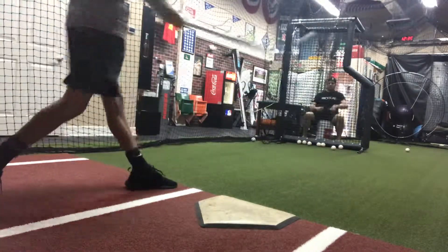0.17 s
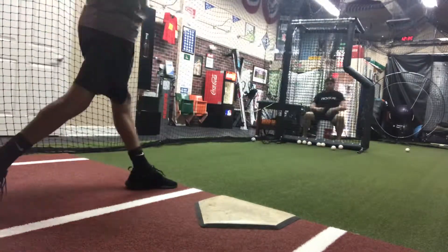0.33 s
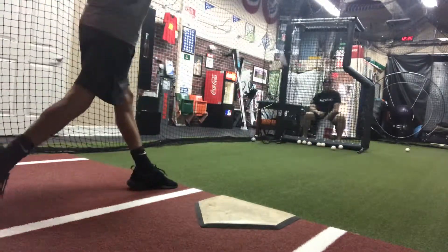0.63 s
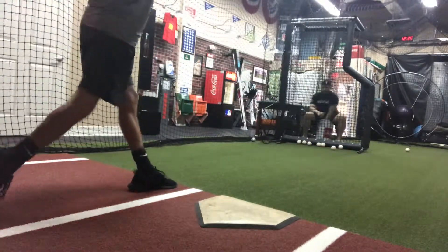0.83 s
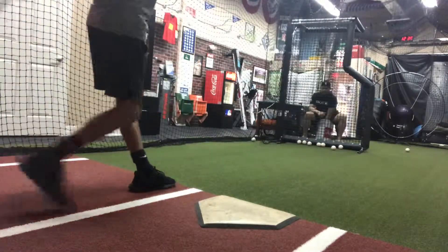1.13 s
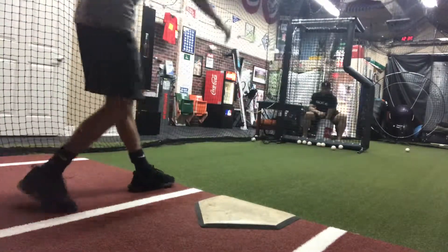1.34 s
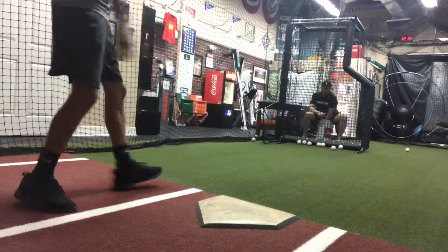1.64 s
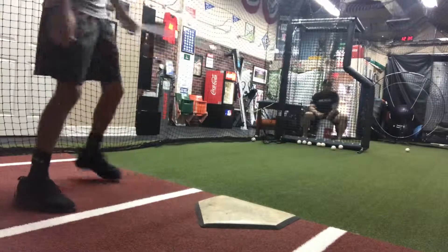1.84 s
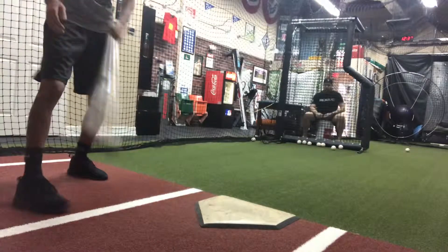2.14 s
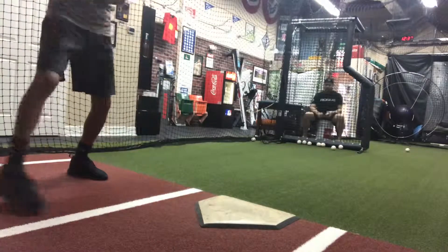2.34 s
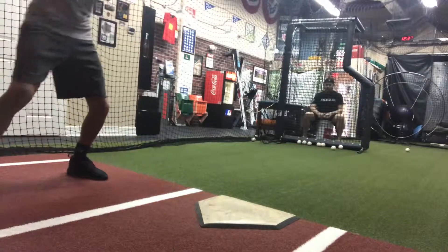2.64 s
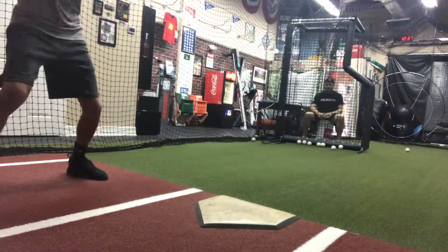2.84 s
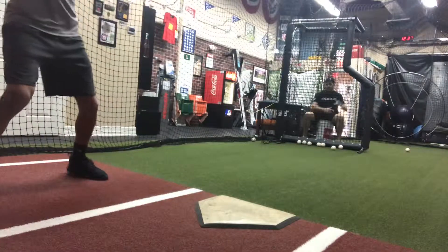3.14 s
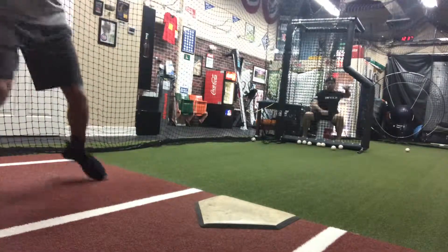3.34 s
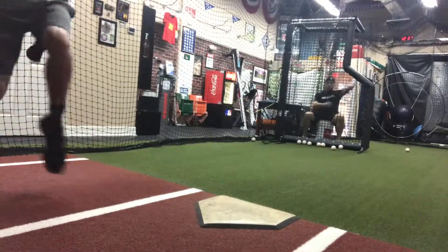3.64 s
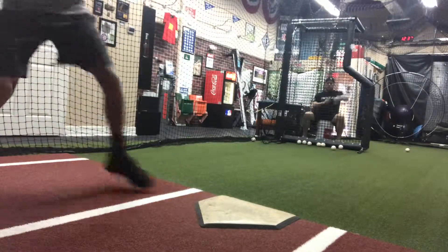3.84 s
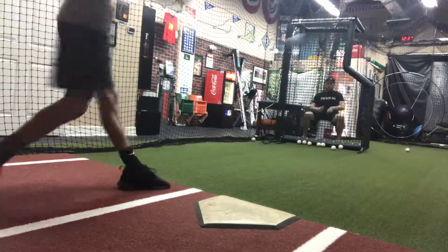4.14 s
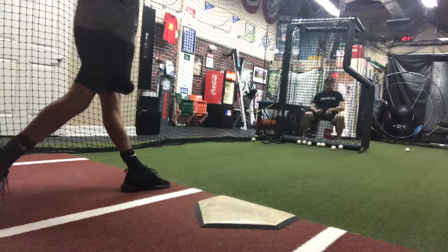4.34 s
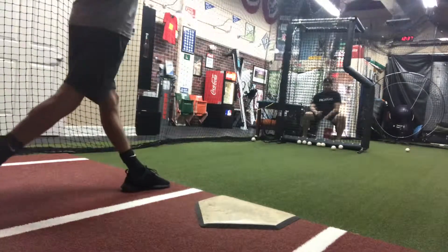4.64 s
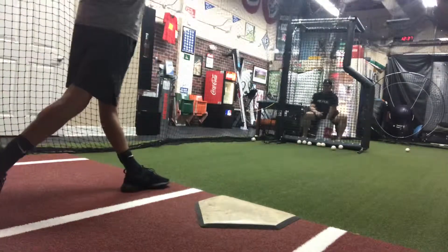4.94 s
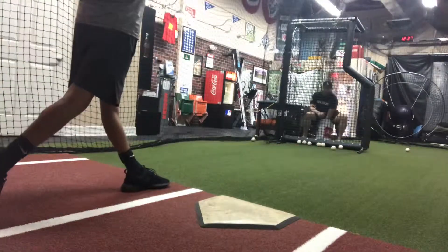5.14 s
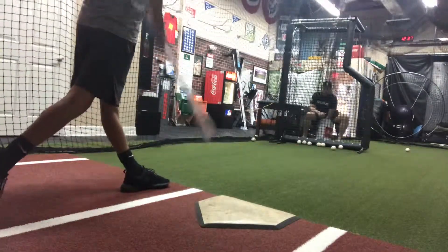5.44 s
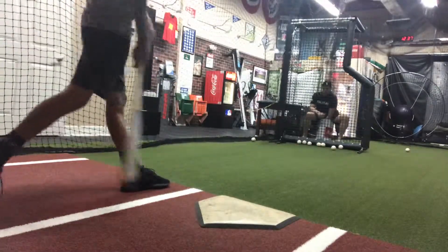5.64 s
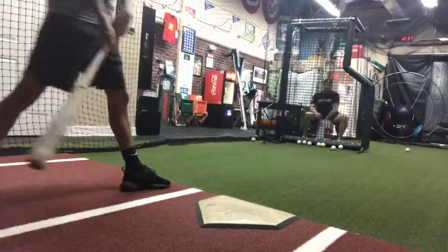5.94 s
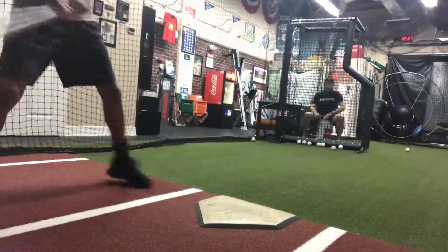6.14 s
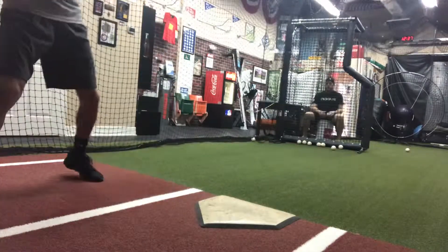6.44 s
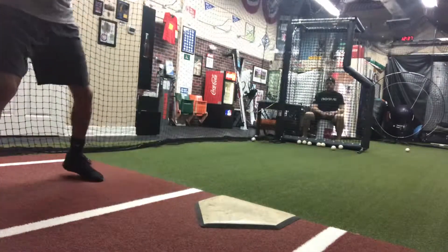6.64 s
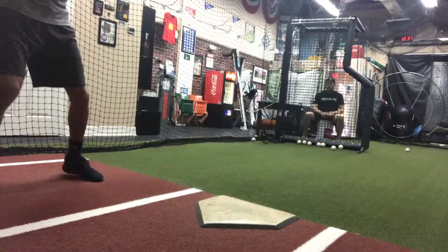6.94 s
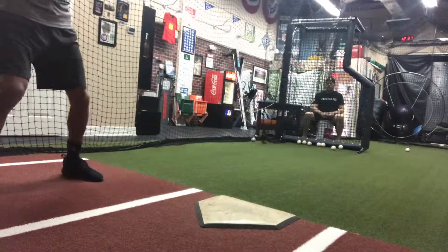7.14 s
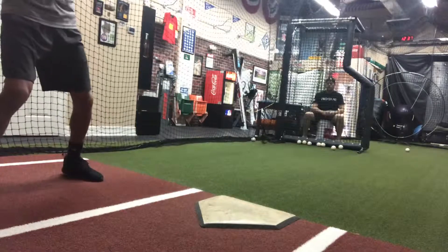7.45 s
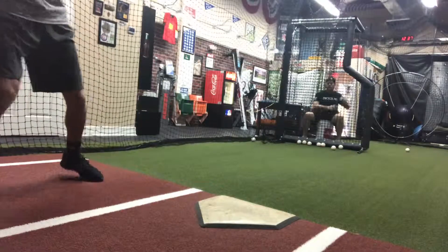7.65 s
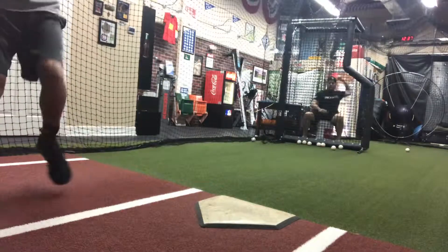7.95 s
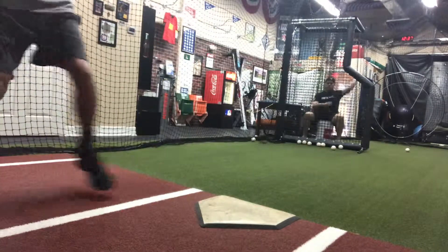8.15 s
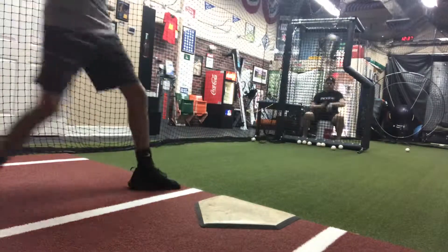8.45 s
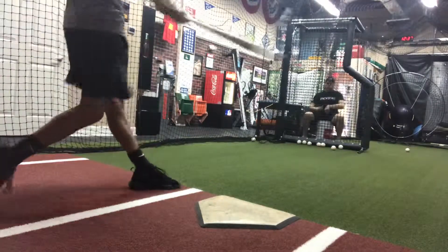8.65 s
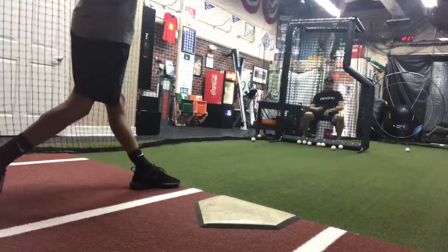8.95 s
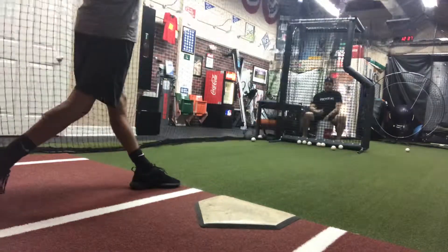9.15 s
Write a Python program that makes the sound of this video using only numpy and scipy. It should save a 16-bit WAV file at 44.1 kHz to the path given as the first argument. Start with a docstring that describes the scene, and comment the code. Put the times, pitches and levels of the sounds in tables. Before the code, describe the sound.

Close to a small microphone near the floor, three very loud, ringing bat hits stand out against quiet room air. The first is followed at once by a bright metal clang. Between hits come soft thuds on turf, dry clicks, cloth and shoe rustle and low floor booms. The last swing has a whoosh before impact, and the hard room reverberates.

```python
"""A batter hits three tossed balls in a netted indoor cage with turf floor and hard walls.
Throughout: ventilation hums, shoes and clothes rustle, steps boom through the floor.
The bat cracks at 0.23 s; at 0.38 s the ball clangs off the steel screen frame. Balls and bat tip
then knock on the turf, among small ticks. Further cracks follow at 4.27 s and 8.72 s.
Contacts are filtered clicks and ringing modes with echoes and a hall; the rest is shaped noise."""
import sys
import numpy as np
from scipy import signal
from scipy.io import wavfile

SR = 44100
rng = np.random.default_rng(int(sys.argv[2]) if len(sys.argv) > 2 else 0)


def bounce(signal):
    """Save signal as a 16-bit WAV file at the path given by the first command-line argument."""
    frames = np.transpose(np.atleast_2d(signal))
    limited = np.clip(frames, -1, 1)
    pcm = np.round(limited * 32767).astype(np.int16)
    wavfile.write(sys.argv[1], SR, pcm)


def boost_factor(decibels):
    """Convert a level in decibels to a linear amplitude factor."""
    exponent = np.asarray(decibels, float) / 20
    return 10 ** exponent


N = 410130
COARSE_S = np.arange(0, N + 40, 40) / SR   # time axis of slow controls

# bat on ball: t/s, click/dB, floor echo/ms, near wall echo/ms, hall send/dB, barrel ring/dB
HITS = [(0.233, -1, 1.7, 6.1, -16.5, 3), (4.272, -1.5, 1.3, 5.5, -19.5, 6), (8.718, 1, 4.5, 5.5, -19, 5)]


def bat():
    """A hard click excites the barrel's bending rings; floor, wall, ceiling and posts echo it."""
    # barrel's bending rings: f/Hz, width/Hz, share of the barrel ring dB
    barrel = [(1095, 86, 1.2), (1730, 180, 0.58), (2390, 150, 0.88)]
    # floor, near wall, ceiling, scatter from posts and legs: level/dB
    echo_levels_db = [-1.5, 10, -1.5, -4.5]
    # ceiling echo of each hit: lag/ms
    ceiling_lags_ms = [16.3, 17.4, 16.1]
    ceiling_treble_db = 8   # the hard ceiling gathers the top of the crack into one flick
    near, sent = np.zeros(N), np.zeros(N)
    treble = signal.butter(2, 5000, "high", fs=SR)
    no_treble = signal.butter(2, 4000, fs=SR)
    for (s, db, floor_ms, wall_ms, hall_db, barrel_db), ceiling_ms in zip(HITS, ceiling_lags_ms):
        rings = [(hz, width_hz, share * barrel_db) for hz, width_hz, share in barrel]
        crack = peaks(snap(db, cut_hz=340), rings)
        soft = signal.lfilter(*no_treble, crack)
        sharp = signal.lfilter(*treble, crack)
        scattered = scatter(boost_factor(5.5) * soft + boost_factor(-4) * crack, .007)
        add(near, s, crack + boost_factor(-2) * sharp + boost_factor(echo_levels_db[3]) * scattered)
        lags_ms = [floor_ms, wall_ms, ceiling_ms]
        for lag_ms, echo_db, copy in zip(lags_ms, echo_levels_db, [soft, -soft, soft]):
            add(near, s + lag_ms / 1000, boost_factor(echo_db) * copy)
        add(near, s + ceiling_ms / 1000, boost_factor(ceiling_treble_db) * sharp)
        add(sent, s, boost_factor(hall_db) * crack)
    return near, sent


def frame():
    """The ball's slap rattles frame and net; the steel tube's modes ring on, direct and in the hall."""
    # ball on steel: t/s, click/dB
    clangs = [(0.379, -0.5)]
    # steel tube modes: f/Hz, level/dB, t60/s
    steel_modes = [(3025, -10, .3), (3330, -7, .4), (3990, -4, .45), (4010, -1, .8), (4070, -8, .3),
                   (4600, -11, .3), (4810, -14, .25), (5670, -11, .4), (5780, -14, .25)]
    near, sent = np.zeros(N), np.zeros(N)
    for s, db in clangs:
        slap = peaks(snap(db, cut_hz=140), [(2560, 4400, -3), (6900, 700, 4.5)])
        steel = strike(tap(db - 33, length_s=1), steel_modes, spread_db=1)
        add(near, s, scatter(slap, .008))
        add(near, s, boost_factor(-7) * steel)
        add(sent, s, boost_factor(-18) * slap)
        add(sent, s, boost_factor(-25) * steel)
    return near, sent


def knocks():
    """Dull knocks on turf: a short tick, then a soft push rings the floor modes around its pitch."""
    # knocks: t/s, push/dB, centre pitch/Hz, tick click/dB, hall send/dB
    contacts = [(0.38, -6.5, 605, -33, -32), (0.544, -17.5, 333, -15, -29), (1.133, -40.5, 433, -33, -31),
                (1.791, -40, 554, -43, -28.5), (2.225, -18, 218, -27, -33.5), (2.629, -48, 315, -55, -24),
                (2.85, -21, 296, -40, -37.5), (3.229, -27.5, 224, -49.5, -35),
                (3.46, -37, 194, -61.5, -34.5), (4.275, -26.5, 240, -60, -25.5),
                (5.423, -22, 385, -47.5, -31), (5.779, -41, 430, -46, -31), (5.921, -41, 250, -60, -33),
                (6.296, -31, 290, -43, -35), (6.454, -37, 201, -52.5, -30), (8.491, -39.5, 265, -37, -40),
                (8.959, -32.5, 173, -64, -29), (9.02, -34, 171, -67, -27)]
    # floor modes: f/Hz, level/dB, t60/s
    turf_modes = [(102, -6, .06), (175, 0, .05), (275, 1, .045), (330, 0, .04), (420, 0, .03),
                  (520, 0, .025), (640, -3, .02), (780, -6, .015)]
    side_wall_s, side_wall_db = 0.022, -6.5   # one clear echo of each thud
    near, sent = np.zeros(N), np.zeros(N)
    lowpass = signal.butter(2, 900, fs=SR)
    for s, db, hz, tick_db, hall_db in contacts:
        # modes weaken away from the centre pitch
        modes = [(f, level_db - 6 * np.log2(f / hz) ** 2, t60) for f, level_db, t60 in turf_modes]
        thud = signal.lfilter(*lowpass, strike(tap(db, length_s=.4), modes, spread_db=1))
        tick = snap(tick_db, cut_hz=1500)
        add(near, s, tick + boost_factor(-8) * scatter(tick, 0.0015, count=12))
        add(near, s + 0.0019, thud)
        add(sent, s, boost_factor(-30) * tick)
        add(near, s + side_wall_s, boost_factor(side_wall_db) * thud)
        add(sent, s + .015, boost_factor(hall_db) * thud)
    return near, sent


def ticks():
    """Dry pitched clicks of shoes, net and bat shake on; wire netting rattles on at their pitch."""
    # ticks: t/s, click/dB, pitch/Hz, rattle drive/dB, rattle t60/s
    contacts = [(1.2665, -40.5, 4300, -92, .05), (1.594, -25, 3960, -60.5, 0.17),
                (1.6636, -31, 3484, -58.5, 0.27), (2.712, -45.5, 2370, -95, .05),
                (5.3535, -62, 3030, -87, .05), (5.424, -43, 4100, -74.5, 0.18),
                (6.0806, -40, 1790, -72, .3), (6.79, -45, 2430, -90.5, .05), (7.5772, -49, 2466, -102, .05),
                (9.1207, -32, 2680, -81, .05), (9.24, -50, 3800, -80, .05)]
    shake_s, wire_t60_s = 0.0048, .03   # scatter after the click; ring of each jolt of the rattle
    near, sent = np.zeros(N), np.zeros(N)
    t = np.arange(SR // 2) / SR
    for s, db, hz, rattle_db, t60 in contacts:
        tick = peaks(snap(db, cut_hz=3200), [(hz, 600, 10)])
        add(near, s, tick + boost_factor(-8.5) * scatter(tick, shake_s))
        jolts = rng.standard_normal(len(t)) * boost_factor(rattle_db - 60 * t / max(t60, .01)) + 1e-18
        add(near, s, ring(jolts, hz, wire_t60_s))
        add(sent, s, boost_factor(-28.5) * tick)
    return near, sent


def hall(x):
    """Reverberation swells after the first echoes, coarse at first, and dies band by band."""
    # decay: f/Hz, t60/s
    decay_s = [(60, 1), (200, 0.9), (500, 0.74), (1100, 0.81), (3000, 0.79), (5500, 0.74), (8000, .52),
               (11000, 0.5), (16000, 0.38)]
    # colour: f/Hz, level/dB
    colour_db = [(60, -17), (200, -6.5), (500, -1.5), (800, 3.5), (1100, 8), (1400, 4), (2000, 1),
                 (3500, 1), (6000, 2.5), (10000, 1), (16000, -5)]
    delay_s, rise_s = 0.0039, 0.0071
    lumps_db = 2   # bunched reflections make each band swell and dip
    t = np.arange(2 * SR) / SR
    # early on, reflections are still separate
    spikes = np.minimum(rng.exponential(1, len(t)), 4) - 1.5
    coarse = boost_factor(4.5 * np.exp(-t / .25) * spikes)
    draws = rng.standard_normal((2, len(t))) * coarse
    tail = np.zeros(len(t))
    for hz, band in bands(draws):
        fall_db = 60 * t / at_hz(decay_s, hz)
        tail += band * boost_factor(at_hz(colour_db, hz) - fall_db + lumps_db * drift(24)[:len(t)])
    onset = 1 - np.exp(-np.maximum(t - delay_s, 0) / rise_s)
    return signal.fftconvolve(x, tail * onset)[:N]


def rustle():
    """Turf fibres, net and cloth make dense noise grains; the power-weighted slope tilts their colour."""
    # shoes, clothes, net: t/s, peak gain/dB, fall to -20 dB/s, slope/dB per octave
    brushes = [(1.135, -48, .045, .6), (1.64, -49, .05, -2.5), (2.626, -61, .025, 1.2),
               (5.805, -54.5, .11, 3), (6.11, -55.5, .17, -1.5), (0.8, -56, .2, 2.5), (1.38, -58, .2, .6),
               (1.72, -52, .12, -.6), (2.03, -57, .3, .6), (2.7, -63, .2, 1.2), (3.42, -62, .2, 1.5),
               (4.85, -56, .6, 1.5), (7.75, -64, .15, -1.5), (9.0, -46, .4, .6), (9.3, -48, .12, 1.5)]
    # scuffs at or near contacts: t/s, peak gain/dB, fall to -20 dB/s, slope/dB per octave
    scuffs = [(1.268, -47, .035, 1), (1.797, -48, .025, -2.5), (2.227, -41, .01, .6),
              (2.856, -50, .01, 2.5), (3.23, -55, .01, 2), (5.425, -41, .01, 0), (6.299, -51, .012, 1),
              (6.457, -56, .016, 0), (7.85, -62, .03, 1.5), (8.695, -40, .012, -2.5), (0.925, -60, .3, 2),
              (1.595, -45, .2, 1.5), (1.81, -56, .2, -1.5), (2.24, -53, .2, -.6), (5.356, -60, .1, 1.2),
              (5.44, -48, .2, -1.5), (6.31, -58, .15, 1.5), (6.47, -60, .18, .6), (6.79, -62, .15, 2),
              (7.09, -65, .2, 1.5), (7.578, -61, .07, 1.5), (9.24, -43, .05, 3.5)]
    # swings, cut off by the crack: stride/dB, rise per 20 dB/s, whoosh/dB, rise per 20 dB/s
    swing_table = [(-56, 1.5, -34.5, 0.04), (-47.5, 0.35, -36.5, -0.25), (-45.5, 0.25, -18, -0.1057)]
    # grain colour: f/Hz, density/dB
    colour_db = [(180, -15), (300, 3), (519, -0.5), (678, -1), (1340, 1), (2000, -5), (3520, -4.5),
                 (5080, -12), (5800, -11.5), (16000, -38.5)]
    fidget_db, fidget_wander_db = -67, 1   # faint rustle that never stops
    rise_share, scuff_rise_s = .6, .003    # brush rise over its fall; scuff rise from -20 dB

    levels = [swell(s, db, rise_share * fall_s, fall_s, order=2) for s, db, fall_s, slope in brushes]
    levels += [swell(s, db, scuff_rise_s, fall_s, order=2) for s, db, fall_s, slope in scuffs]
    levels = np.array(levels)
    swings = np.zeros(len(COARSE_S))
    for hit, (stride_db, stride_s, whoosh_db, whoosh_s) in zip(HITS, swing_table):
        swings += swell(hit[0], stride_db, stride_s, 0) + swell(hit[0], whoosh_db, whoosh_s, 0)

    power = np.sum(levels ** 2, axis=0) + swings ** 2 + boost_factor(2 * fidget_db)
    slopes = np.array(brushes + scuffs)[:, 3]
    tilt = slopes @ levels ** 2 / power
    gain = smooth(levels.sum(axis=0) + swings) + boost_factor(fidget_db + fidget_wander_db * drift(2.3))

    grains = rng.standard_normal((2, N)) * boost_factor(1.5 * rng.exponential(1, (2, N))) * boost_factor(drift(40))
    parts = [(hz, band * boost_factor(at_hz(colour_db, hz))) for hz, band in bands(grains) if hz > 250]
    scale = np.std(sum(band for hz, band in parts if 1000 < hz < 8000))
    tilted = sum(band * smooth(boost_factor(tilt * np.log2(hz / 3000))) for hz, band in parts)
    return gain / scale * tilted


def boom():
    """The floor shudders under blows and steps: low noise that swells and falls, never quite still."""
    # shudders: t of peak/s, peak level/dB, rise per 20 dB/s, fall per 20 dB/s
    stomps = [(0.26, -35, 0.5, 0.7), (1.68, -39.5, 0.5, 0.7), (2.62, -46.5, 1.4, 0),
              (2.87, -38.5, 0.3, 0.6), (3.24, -45, -2.7, 2.5), (4.28, -35, 0.16, 0.55),
              (4.71, -45.5, .3, 1.4), (5.42, -43.5, .25, 1.5), (7.41, -51.5, 1.2, .2),
              (8.131, -47.5, 1, -0.5), (8.729, -30, -0.3, 0.24), (9.01, -35.5, 1.4, 0.8)]
    # colour: f/Hz, density/dB
    colour_db = [(15, -34), (25, -0.5), (48, -2), (65, 7.5), (108, -2), (179, -7.5), (200, -13), (260, -43),
                 (440, -120)]
    rumble_db, rumble_wander_db = -53, 2
    noise = rng.standard_normal((2, N))
    low = sum(band * boost_factor(at_hz(colour_db, hz)) for hz, band in bands(noise) if hz < 200)
    shudder = smooth(np.sqrt(sum(swell(*row) ** 2 for row in stomps)))
    rumble = boost_factor(rumble_db + rumble_wander_db * drift(8))
    return np.hypot(shudder, rumble) * rms_one(low)


def ventilation():
    """Steady air noise, lightly patchy in each band, with a few noise-driven duct resonances."""
    # air colour: f/Hz, density/dB
    colour_db = [(15, -38), (25, -6.5), (53, -5), (82, 2), (175, -9), (263, -7.5), (575, -15.5),
                 (1100, -22.5), (1190, -29.5), (1560, -26), (3080, -32), (6560, -45), (10400, -64),
                 (14800, -41.5), (16000, -58)]
    # duct resonances: f/Hz, width/Hz, rms level/dB
    ducts = [(68, 25, -58.5), (250, 18, -62), (1200, 40, -72.5)]
    air_db = -54
    noise = rng.standard_normal((2, N))
    air = sum(band * boost_factor(at_hz(colour_db, hz) + 2.4 * drift(5)) for hz, band in bands(noise))
    out = boost_factor(air_db) * rms_one(air)
    for hz, width_hz, db in ducts:
        t60_s = np.log(1000) / (np.pi * width_hz)
        out += boost_factor(db) * rms_one(ring(rng.standard_normal(N), hz, t60_s))
    return out


def snap(db, cut_hz):
    """A hard contact: a click without bass, coloured by wood and leather."""
    # wood and leather: f/Hz, width/Hz, level/dB
    contact_colour = [(559.5, 690, 8), (1940, 580, 6.5), (2920, 890, 9), (4300, 500, 4), (8100, 3100, -2),
                      (10180, 1700, -10), (13000, 2400, -6)]
    highpass = signal.butter(2, cut_hz, "high", fs=SR)
    return peaks(signal.lfilter(*highpass, tap(db, .1)), contact_colour)


def tap(db, length_s):
    """One impulse, then silence."""
    return boost_factor(db) * signal.unit_impulse(int(length_s * SR)) + 1e-18


def peaks(x, table):
    """A chain of broad resonances and dips: f/Hz, width/Hz, level/dB."""
    for hz, width_hz, db in table:
        b, a = signal.iirpeak(hz, hz / width_hz, fs=SR)
        x = x + (boost_factor(db) - 1) * signal.lfilter(b, a, x)
    return x


def ring(x, hz, t60):
    """A damped resonator: a unit click sets a sine of height 1 ringing."""
    r = boost_factor(-60 / (t60 * SR))
    w = 2 * np.pi * hz / SR
    return signal.lfilter([0, np.sin(w)], [1, -2 * r * np.cos(w), r * r], x)


def strike(x, modes, spread_db):
    """A blow gives every mode a strength of its own; neighbours swing in opposite sense."""
    chance = rng.standard_normal(len(modes))
    out = 0
    for k, (hz, db, t60) in enumerate(modes):
        out = out + (-1) ** k * ring(x * boost_factor(db + spread_db * chance[k]), hz, t60)
    return out


def scatter(x, length_s, count=40):
    """Many weak reflections of random sign that thin out and weaken with lag."""
    taps = np.zeros(int(.09 * SR))
    lags_s, signs = rng.random((2, count))
    lags_s = -length_s * np.log(1 - .95 * lags_s)
    places = np.minimum((lags_s * SR).astype(int), len(taps) - 1)
    np.add.at(taps, places, np.sign(signs - .5) * np.exp(-lags_s / length_s / 2))
    return signal.fftconvolve(x, taps)[:len(x)]


def add(out, s, sound):
    """Mix a short sound in at a time."""
    i = int(s * SR)
    out[i:i + len(sound)] += sound[:N - i]


def swell(s, db, rise_s, fall_s, order=1):
    """A level climbs to its peak and falls: evenly in dB (order 1) or with a rounded top (order 2)."""
    late = COARSE_S - s
    # times under 1 ms, negative ones too, act as 1 ms
    distance = np.where(late < 0, -late / max(rise_s, .001), late / max(fall_s, .001))
    return boost_factor(db - 20 * distance ** order)


def smooth(coarse):
    """Interpolate a slow control to every sample."""
    return np.interp(np.arange(N) / SR, COARSE_S, coarse)


def drift(rate_hz):
    """Slow random wander of spread 1: noise through two equal poles, one value per 40 samples."""
    r = np.exp(-80 * np.pi * rate_hz / SR)
    noise = rng.standard_normal(N // 40 + 2002)
    slow = signal.lfilter([1], [1, -2 * r, r * r], noise)[2000:]   # drop the run-in
    return np.interp(np.arange(N) / 40, np.arange(len(slow)), rms_one(slow))


def bands(source):
    """Third-octave bands (centre Hz, signal), neighbours cut from unrelated draws."""
    edges_hz = 25 * 2 ** np.arange(0, 9.5, 1 / 3)
    for k, (low, high) in enumerate(zip(edges_hz, edges_hz[1:])):
        sos = signal.butter(2, [low, high], "band", fs=SR, output="sos")
        yield np.sqrt(low * high), signal.sosfilt(sos, source[k % 2])


def at_hz(points, hz):
    """Read a table on a log-frequency axis."""
    f, value = np.array(points).T
    return np.interp(np.log(hz), np.log(f), value)


def rms_one(x):
    """Scale to unit rms."""
    return x / np.sqrt(np.mean(x ** 2) + 1e-20)


def scene():
    """Struck sounds share the hall; the steady ones go in without it."""
    near, sent = np.sum([bat(), frame(), knocks(), ticks()], axis=0)
    return (near + hall(sent) + rustle() + boom() + ventilation())[None]


def roll_off(x):
    """The treble ends steeply here."""
    return signal.sosfilt(signal.butter(12, 17000, fs=SR, output="sos"), x)


def record(dry):
    """A small microphone hisses, drops the deepest bass and the top, and rounds off the peaks."""
    hiss_db = -75.5   # gain of the noise above 11 kHz
    treble = signal.butter(2, 11000, "high", fs=SR, output="sos")
    no_bass = signal.butter(4, 34, "high", fs=SR, output="sos")
    no_top = signal.ellip(8, .3, 60, 15700, fs=SR, output="sos")
    hiss = signal.sosfilt(treble, rng.standard_normal(N))
    heard = signal.sosfilt(no_bass, dry + boost_factor(hiss_db) * hiss)
    heard = signal.sosfilt(no_top, np.tanh(heard))
    return roll_off(np.clip(heard, -.98, .98))


dry = scene()
out = record(dry)
bounce(out)
```